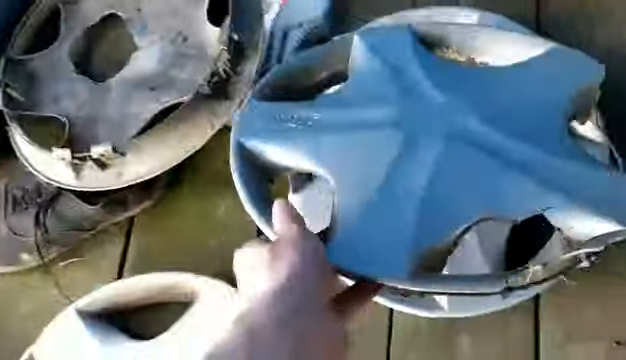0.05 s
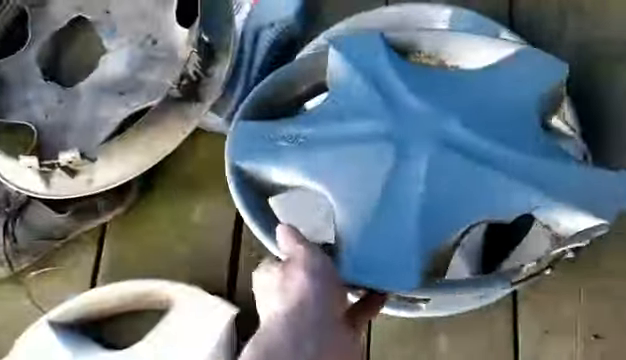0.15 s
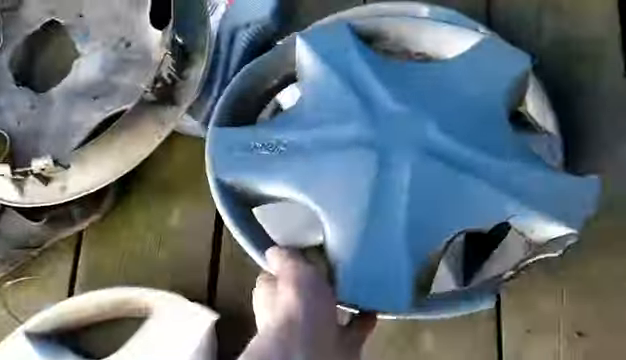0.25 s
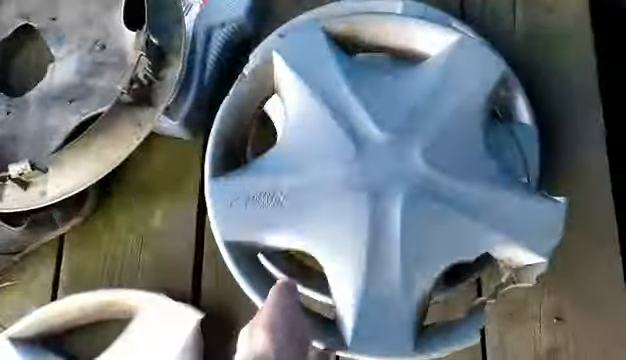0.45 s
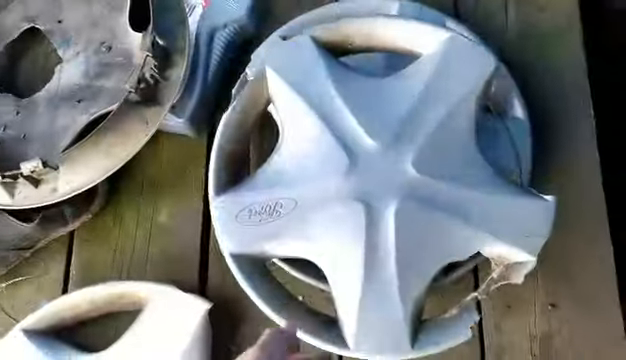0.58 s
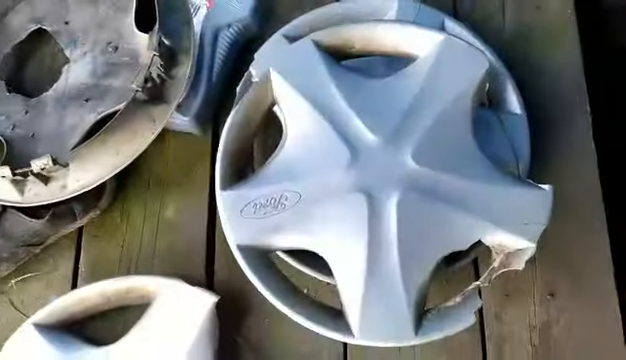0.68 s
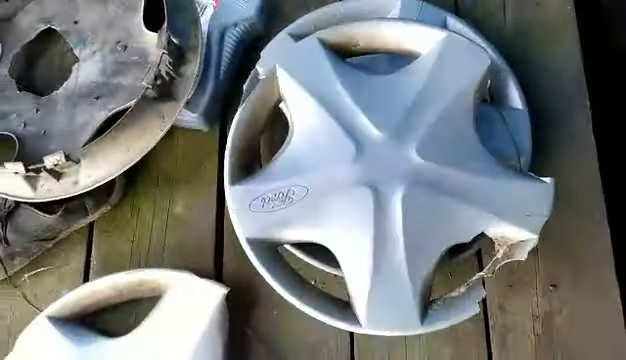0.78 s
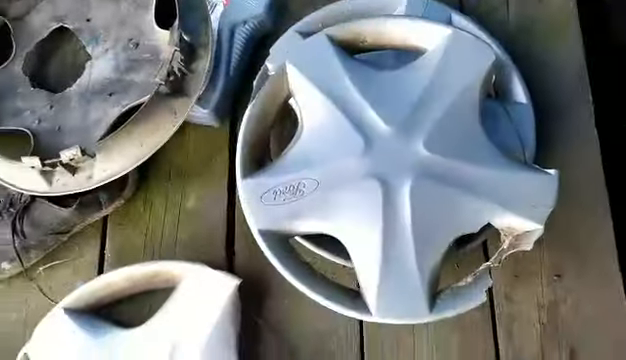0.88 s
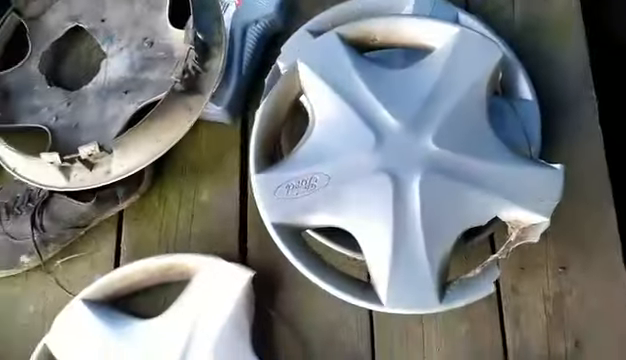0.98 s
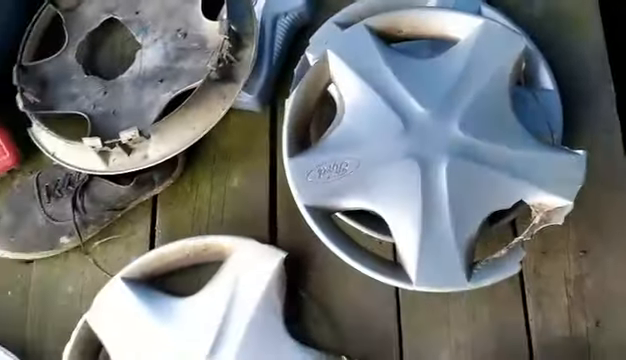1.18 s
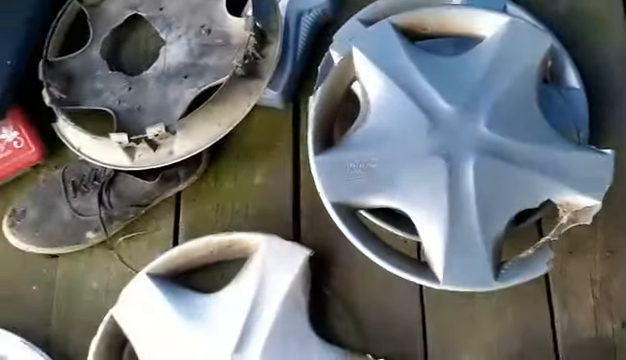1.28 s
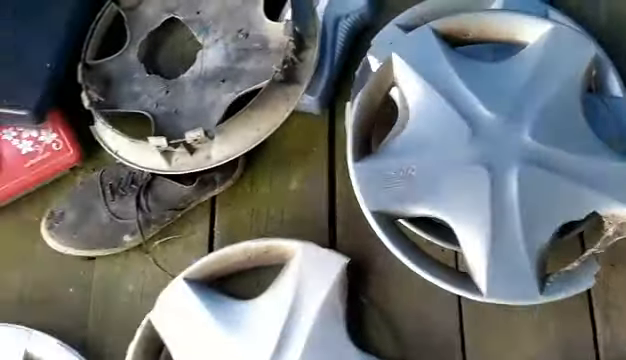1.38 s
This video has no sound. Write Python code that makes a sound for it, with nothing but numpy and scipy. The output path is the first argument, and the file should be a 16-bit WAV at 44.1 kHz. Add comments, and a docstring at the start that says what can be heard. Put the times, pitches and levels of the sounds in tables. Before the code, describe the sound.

Close by on an outdoor wooden deck, one plastic hubcap scrapes and ticks across another. It is set down with a sharp triple clack, knocks a few more times and settles, leaving a brief hollow hum.

```python
"""Over a quiet outdoor background, a plastic hubcap slides across another on a wooden deck.
The rims scrape, knock lightly and catch in small ticks. A loud triple clack follows at 0.52 s,
then the hubcap rocks and settles. Each contact gives a crack and a short dense ring of the shell;
the weight sets the hollow stack and the boards booming."""
import sys
import numpy as np
from scipy import signal
from scipy.fft import rfft, irfft
from scipy.io import wavfile
from scipy.ndimage import uniform_filter1d

SR = 44100
rng = np.random.default_rng(int(sys.argv[2]) if len(sys.argv) > 2 else 0)


def pcm_store(signal):
    """Save signal as 16-bit PCM."""
    levels = np.round(np.clip(np.atleast_2d(signal), -1, 1) * 32767)
    wavfile.write(sys.argv[1], SR, levels.astype(np.int16).T)


N = 63945


def undb(db):
    """Decibels to gain."""
    return 10 ** (np.asarray(db) / 20)


def unit(x):
    """Scale to rms 1."""
    return x / np.sqrt(np.mean(x ** 2))


def at(points, hz):
    """Interpolate (freq_hz, value) points over log frequency."""
    p = np.array(points, float)
    return np.interp(np.log(np.maximum(hz, 1)), np.log(p[:, 0]), p[:, 1])


def fade(t, t60_s):
    """Exponential decay."""
    return np.exp(-np.log(1000) * t / t60_s)


def add(out, start_s, x):
    """Mix x into out from start_s."""
    i = int(start_s * SR)
    out[:, i:i + x.shape[1]] += x[:, :N - i]


def stereo_spectrum(correlation, size):
    """Frequencies and spectra of two partly correlated white noises."""
    f = np.fft.rfftfreq(size, 1 / SR)
    mid, side = rfft(rng.standard_normal((2, size)))
    c = at(correlation, f)
    return f, mid * np.sqrt(1 + c) + side * np.sqrt(1 - c) * np.array([[1], [-1]])


def noise(colour, correlation):
    """Coloured stereo noise, rms 1."""
    f, white = stereo_spectrum(correlation, N)
    return unit(irfft(white * undb(at(colour, f)), N))


def wander(smooth_s):
    """Smooth random curve, rms 1."""
    width = int(smooth_s * SR)
    rough = uniform_filter1d(rng.standard_normal(N), width, mode="wrap")
    return unit(uniform_filter1d(rough, width, mode="wrap"))


def ring(modes, t, spread_rad_per_khz=0.56, alternate_above_hz=700):
    """Decaying modes; higher ones alternate in sign and differ more in phase between channels."""
    out = 0
    for k, (hz, db, t60_s) in enumerate(modes):
        spread_rad = min(spread_rad_per_khz * hz / 1000, np.pi / 2)
        phase = 2 * np.pi * hz * t + spread_rad * np.array([[0.5], [-0.5]])
        sign = (-1) ** k if hz > alternate_above_hz else 1
        out = out + sign * undb(db) * fade(t, t60_s) * np.sin(phase)
    return out * np.sqrt(2)


# Outdoor noise, plus the stack's hum at 237 Hz: freq_hz, density_db
BACKGROUND_SPECTRUM = [(20, -18), (40, -10.5), (62, 5.5), (88, -7.5), (137, -1.5), (175, -17), (237, -5),
                       (310, -15.5), (600, -15), (800, -10.5), (1000, -6), (1400, -12), (2300, -17.5),
                       (3300, -30.5), (4500, -35.5), (9000, -40.5), (13000, -44.5)]
# Left-right likeness of the background: freq_hz, correlation
BACKGROUND_CORRELATION = [(120, 0.95), (300, 0.92), (620, 0.39), (1360, -0.49), (3000, 0.11), (9000, 0.024)]


def background(level_db=-44):
    """Steady outdoor rumble and hiss, with a faint hum of the hollow stack."""
    return noise(BACKGROUND_SPECTRUM, BACKGROUND_CORRELATION) * undb(level_db)


# Slides of rim on rim: start_s, length_s, level_db
SLIDES = [(0, 0.2, -49), (0.242, 0.059, -40), (0.305, 0.174, -45)]
# Friction spectrum: freq_hz, density_db
FRICTION_SPECTRUM = [(300, -0.5), (1200, 8.5), (2500, 2.5), (5000, -8), (9000, -9.5), (12500, -14),
                     (14000, -47)]
# Left-right likeness of contact noise: freq_hz, correlation
NEAR_CORRELATION = [(120, 1), (300, .97), (700, 0.72), (1400, 0.1), (4000, -0.05), (9000, 0.3),
                    (12000, 0.4)]


def scrape(edge_s=0.014, grain_s=0.0018, grain_db=-0.5):
    """Grainy friction as the rim slides into place."""
    t = np.arange(N) / SR
    pressure = 0
    for start_s, length_s, level_db in SLIDES:
        inside_s = np.minimum(t - start_s, start_s + length_s - t)
        pressure += undb(level_db) * np.clip(inside_s / edge_s + 0.5, 0, 1)
    friction = noise(FRICTION_SPECTRUM, NEAR_CORRELATION)
    return pressure * unit(friction * undb(grain_db * wander(grain_s)))


# Rim catches: start_s, level_db, centre_hz
RIM_CATCHES = [(0.4263, -37, 3000), (0.443, -37, 2500), (0.4792, -34.5, 3000), (0.4853, -43, 6000),
               (0.491, -42, 7000), (0.4996, -37.5, 4000)]


def catches(t60_s=0.013, width_octaves=0.29):
    """Small dry ticks where the sliding rim catches and slips."""
    out, size = np.zeros((2, N)), SR // 10
    decay = fade(np.arange(size) / SR, t60_s)
    for start_s, level_db, centre_hz in RIM_CATCHES:
        f, white = stereo_spectrum(NEAR_CORRELATION, size)
        band = np.exp(-(np.log2((f + 1) / centre_hz) / width_octaves) ** 2)
        add(out, start_s, undb(level_db) * unit(irfft(white * band, size)) * decay)
    return out


# Landings of the weight: start_s, boards_db, stack_db
LANDINGS = [(.205, -43, -38), (0.271, -47, -36.5), (.478, -34, -51), (0.5147, -38, -31),
            (0.5243, -30.5, -27.5), (.645, -69, -32.5), (.692, -34, -26.5), (0.791, -60, -33.5)]
# Deck board modes: pitch_hz, level_db, t60_s
BOARD_MODES = [(105.76, -0.5, 0.5), (136.3, -13, 0.96)]
# Hollow stack modes: pitch_hz, level_db, t60_s
STACK_MODES = [(235.5, -5, 0.54), (209, -14, 0.19), (263, -8.5, 0.14), (345.5, -21.5, 0.56)]


def boom(rise_s=0.0051):
    """Low modes of boards and hollow stack swell and die after each landing."""
    out, t = np.zeros((2, N)), np.arange(N) / SR
    boards, stack = ring(BOARD_MODES, t), ring(STACK_MODES, t)
    rise = 1 - np.exp(-t / rise_s)
    for start_s, boards_db, stack_db in LANDINGS:
        add(out, start_s, (undb(boards_db) * boards + undb(stack_db) * stack) * rise)
    return out


# Shell resonances, plus a separate top-treble cut that softens the crack: centre_hz, width_hz, gain_db
CRACK_SHAPE = [(1520, 120, 0), (2185, 160, 9.5), (2800, 160, 4.5), (4240, 91, 9.5), (5270, 220, 7),
               (6790, 190, 15), (8170, 750, 18.5), (8860, 330, 14.5), (9740, 770, 19.5), (11500, 750, -10)]


def crack_shape_db(f, scatter_db=2.5, detune=0.012):
    """Spectral shape of one crack; each spot favours other peaks."""
    curve_db = 0
    for centre_hz, width_hz, gain_db in CRACK_SHAPE:
        db = rng.normal(gain_db, scatter_db)
        hz = centre_hz * rng.normal(1, detune)
        curve_db += db / (1 + (2 * (f - hz) / width_hz) ** 2)
    return curve_db


# Half-octave spectrum of crack and dense ring: freq_hz, level_db
PLASTIC_SPECTRUM = [(150, -13), (300, -9.5), (550, -7.5), (800, -5.5), (1100, -6), (1500, -3), (2200, -3.5),
                    (3200, -3), (6300, -3), (9200, -5.5), (13000, -15)]
# Dense ring decay: freq_hz, t60_s
DENSE_DECAY = [(200, 0.89), (800, 0.3), (2000, 0.27), (5000, 0.21), (10000, 0.27)]
CRACK_T60_AT_1KHZ_S, CRACK_T60_EXPONENT = 0.086, 0.34
TICK_DB, TICK_T60_S, TICK_ABOVE_HZ = 2, 0.018, 3000


def crack_and_dense_ring(t, colour, dense_db, ripple, dense_shape_share=0.36):
    """Noise of one contact: a treble tick, a resonant crack and the ring of crowded shell modes."""
    size = len(t)
    f, white = stereo_spectrum(NEAR_CORRELATION, size)
    rippled = white * undb(np.interp(f, *ripple))
    shape_db = crack_shape_db(f)
    crack_spectrum = rippled * undb(shape_db)
    dense_spectrum = 1j * rippled * undb(dense_shape_share * shape_db)  # in quadrature
    out = 0
    for hz in 13000 / 2 ** (np.arange(14) / 2):
        offset_bands = 2 * np.log2((f + 1) / hz)
        band = np.cos(np.pi / 2 * np.clip(offset_bands, -1, 1)) ** 2
        envelope = fade(t, CRACK_T60_AT_1KHZ_S * (1000 / hz) ** CRACK_T60_EXPONENT)
        if hz > TICK_ABOVE_HZ:
            envelope += undb(TICK_DB) * fade(t, TICK_T60_S)
        crack = unit(irfft(crack_spectrum * band, size)) * envelope
        dense = unit(irfft(dense_spectrum * band, size)) * fade(t, at(DENSE_DECAY, hz))
        out += (crack + undb(dense_db) * dense) * undb(at(PLASTIC_SPECTRUM, hz) + at(colour, hz))
    return out


# Mode cluster of a struck spot: pitch_ratio, level_db, t60_s
SPOT_MODES = [(1, -2, 0.07), (1.18, -10.5, 0.071), (1.06, -14, 0.038)]


def struck_spot(t, low_hz, low_db, high_hz, high_db):
    """The struck spot rings briefly in two close clusters of modes."""
    modes = [(note_hz * ratio, note_db + db, t60_s)
             for note_hz, note_db in ((low_hz, low_db), (high_hz, high_db))
             for ratio, db, t60_s in SPOT_MODES]
    return ring(modes, t)


# Shell contacts: start_s, level_db, body_db, middle_db, treble_db, top_db, modes_db, dense_db,
# left_minus_right_db, attack_s, low_note_hz, low_note_db, high_note_hz, high_note_db
CONTACTS = [(.2020, -36, 2.5, -0.5, -4, -12, -9, -7, -0.5, 0.00074, 683.5, 4, 1215, 3.5),
            (0.2498, -51, 8, -23, -5, 4.5, -24, 5, 0.5, 0.0037, 1150, 14, 1700, 0),
            (0.3849, -42, -7.5, 2.5, 1.5, 3.5, -28, 0, 2, 0.00092, 1723, 12, 3160, 6),
            (.3900, -32.5, -6.5, 8.5, 0.5, -27, -16, -11, 0, 0.0017, 1291, 12, 2845, 5),
            (0.4671, -36.5, -1.5, 5.5, 2.5, -5, -8.5, -11, 0, 0.0011, 1180, 1, 1900, -1),
            (0.5176, -25.5, -1, 3.5, -4.5, -16.5, -10.5, -10.5, 0, 0.00039, 816, 5.5, 1090, -18),
            (.5270, -25.5, -6, 5.5, -5, -8.5, -2.5, -11, 1, 0.00097, 838, -4, 1500, -4),
            (.5335, -26.5, -1, 0.5, 3, 8, -3, -15, 0.5, 0.00029, 852, -0.5, 2383, 1.5),
            (.5430, -29.5, -6, -4.5, -4, -14, -11.5, 0.5, 0, 0.0017, 874, 6, 2368, 0),
            (0.588, -30, 4, 0.5, -13, -20, -7.5, -10, 0, 0.0023, 647, -10, 1176, -3),
            (0.625, -39, 8, -5, -10, -13, -14, -10, -2, 0.0033, 652, 8, 815, -4),
            (0.6891, -24.5, -16.5, -2.5, -2, -17, -11, -7, 1, 0.00051, 756, 4.5, 2087, -2),
            (.7060, -39, 10, 11, -3, -36, -10, -15, -4.5, 0.0025, 686, 5, 2450, -2),
            (.7240, -39, 8, 8.5, 1, -30, -10, -5.5, 1.5, 0.0037, 693, 12, 1178, 9),
            (.7660, -37.5, -2.5, -14, -3, -25, -18, -8, -0.5, 0.0024, 805, 11.5, 1950, 2)]
# Tone colour anchors: body_hz, neutral_hz, middle_hz, treble_hz, top_hz
ANCHORS_HZ = (250, 700, 1600, 4200, 12000)
# Clear shell modes: pitch_hz, level_db, t60_s
SHELL_MODES = [(403, -8, 0.99), (472, -9.5, 0.29), (534, -9, 0.38), (694.6, -1, 0.27), (791.5, -7.5, 0.29),
               (841, -2, 0.17), (1002, -11, 0.25), (1330, -3, 0.22), (1497, -6, 0.17), (2345, -8.5, 0.11),
               (2837, -13, 0.21), (3670, -19, 0.1), (4090, -4, 0.082), (5400, -6, 0.0435)]
TOP_HZ = 13200


def hubcap(ripple_step_hz=80, ripple_db=3):
    """Shell knocks on shell; the crowded modes bunch into the same spectral ripple at every blow."""
    out, t = np.zeros((2, N)), np.arange(SR // 2) / SR
    grid_hz = np.arange(0, TOP_HZ, ripple_step_hz)
    ripple = grid_hz, rng.normal(0, ripple_db, len(grid_hz))
    for (start_s, level_db, body_db, middle_db, treble_db, top_db,
         modes_db, dense_db, pan_db, attack_s, *notes) in CONTACTS:
        colour = list(zip(ANCHORS_HZ, (body_db, 0, middle_db, treble_db, top_db)))
        modes = [(hz, db + at(colour, hz), t60_s) for hz, db, t60_s in SHELL_MODES]
        knock = undb(modes_db) * ring(modes, t) + struck_spot(t, *notes)
        knock += crack_and_dense_ring(t, colour, dense_db, ripple)
        attack = 1 - np.exp(-t / attack_s)
        gains = undb(level_db + pan_db * np.array([[0.5], [-0.5]]))
        add(out, start_s, knock * attack * gains)
    return out


def scene():
    """Hubcap, deck and open air."""
    return hubcap() + boom() + scrape() + catches() + background()


def record(dry):
    """Soft-clip the loudest peaks, then low-pass."""
    ceiling = 0.65
    lowpass = signal.ellip(8, 0.2, 80, TOP_HZ, fs=SR, output="sos")
    return signal.sosfilt(lowpass, ceiling * np.tanh(dry / ceiling))


dry = scene()
out = record(dry)
pcm_store(out)
```